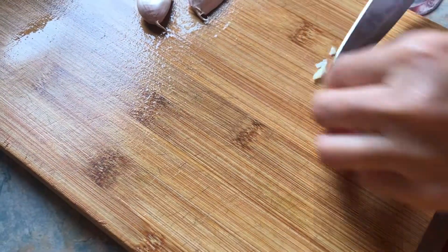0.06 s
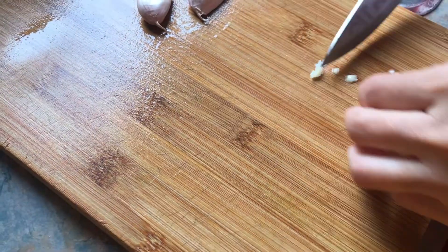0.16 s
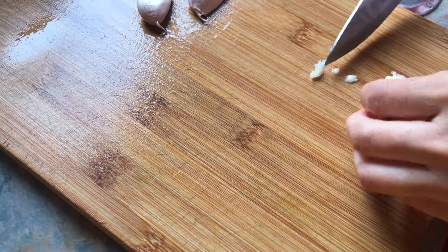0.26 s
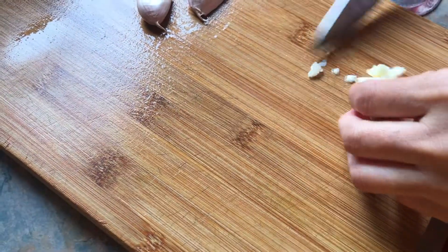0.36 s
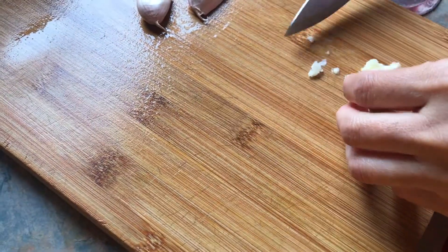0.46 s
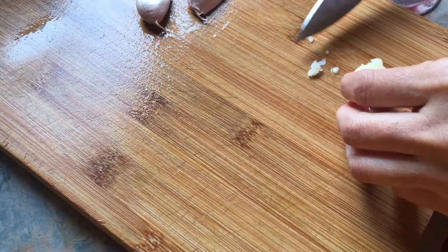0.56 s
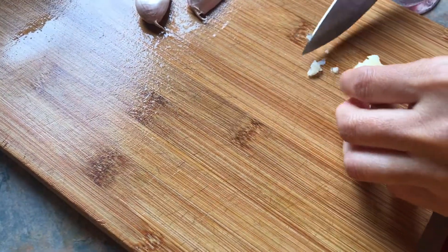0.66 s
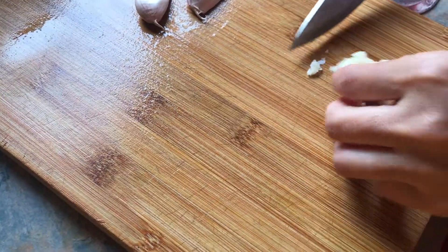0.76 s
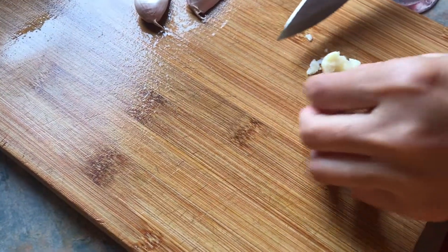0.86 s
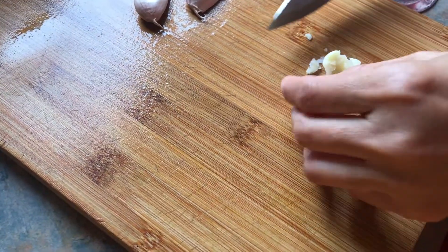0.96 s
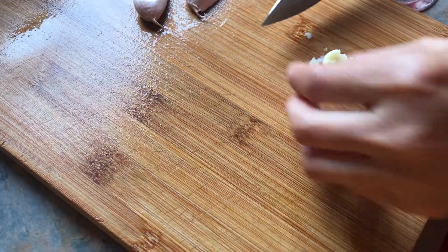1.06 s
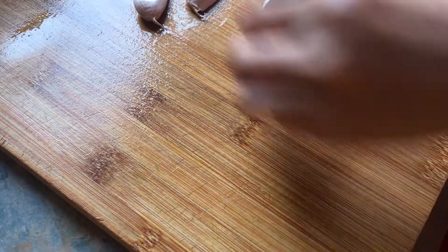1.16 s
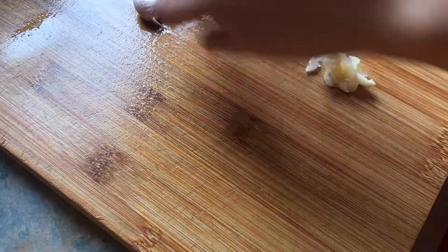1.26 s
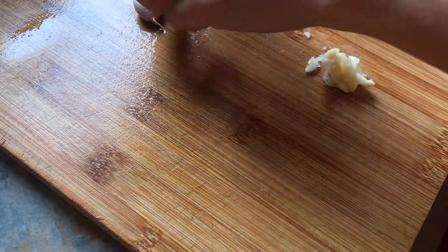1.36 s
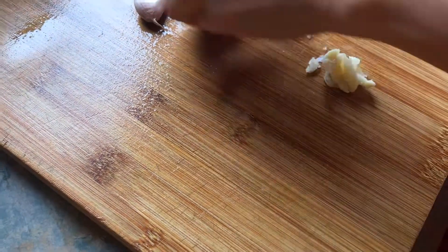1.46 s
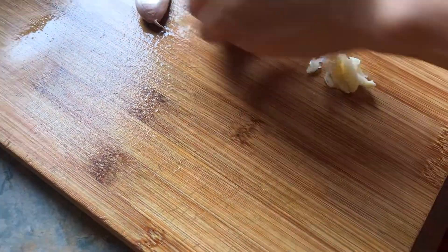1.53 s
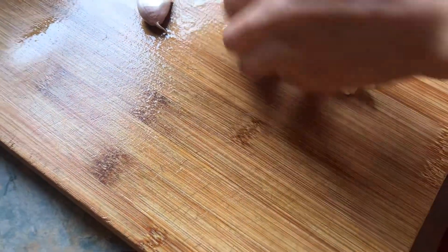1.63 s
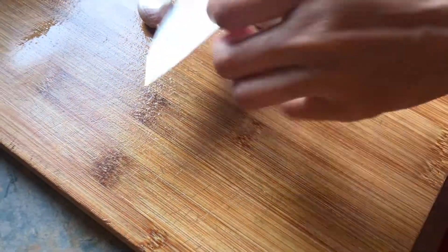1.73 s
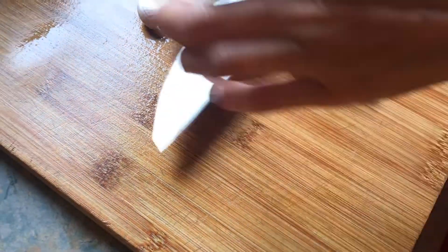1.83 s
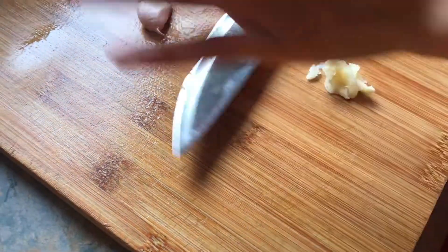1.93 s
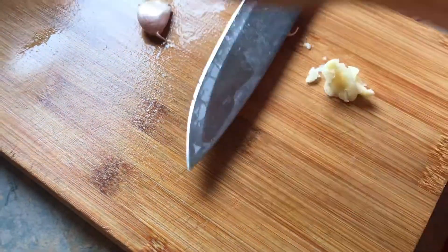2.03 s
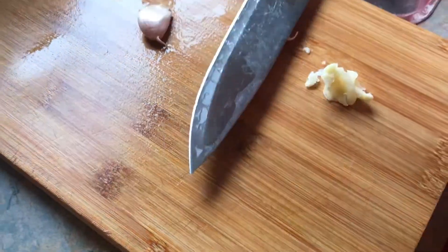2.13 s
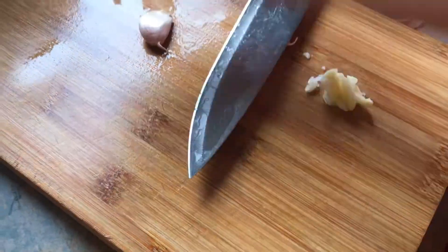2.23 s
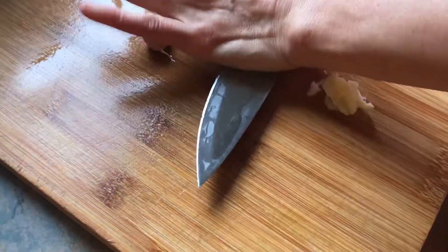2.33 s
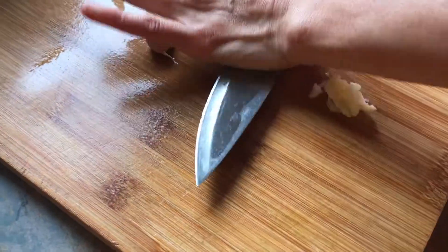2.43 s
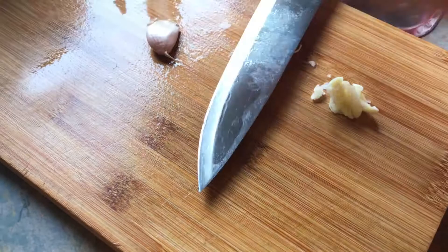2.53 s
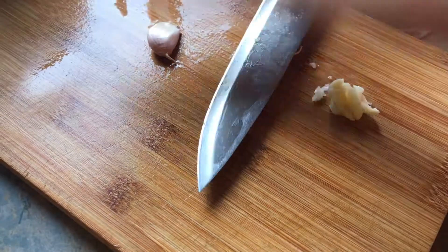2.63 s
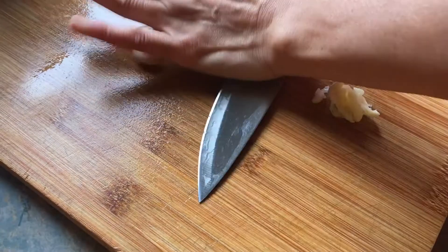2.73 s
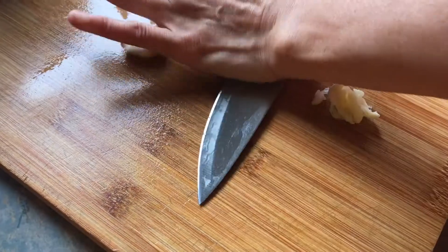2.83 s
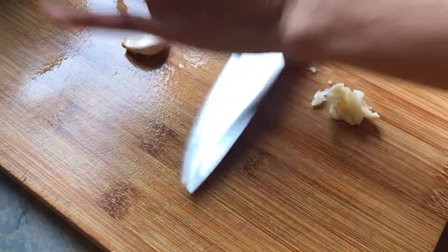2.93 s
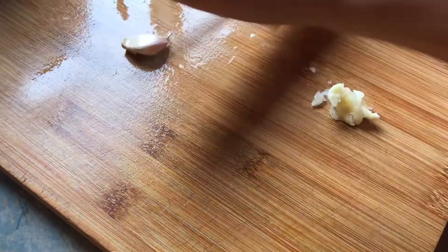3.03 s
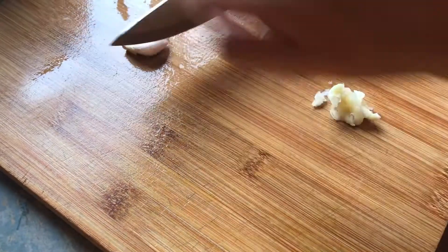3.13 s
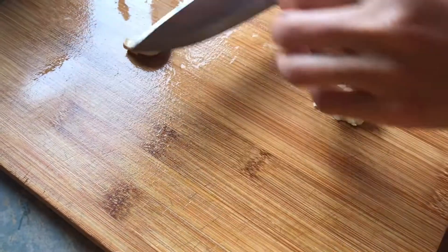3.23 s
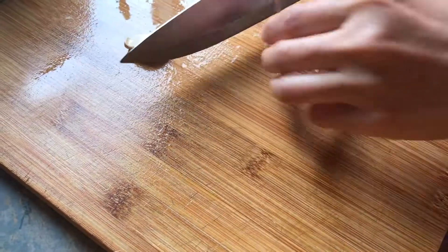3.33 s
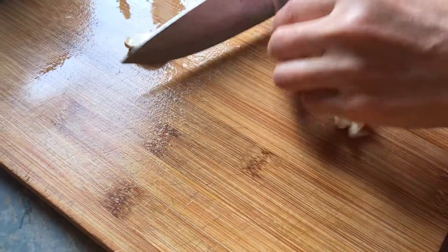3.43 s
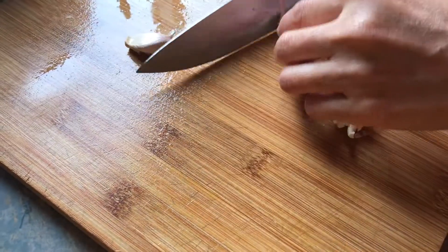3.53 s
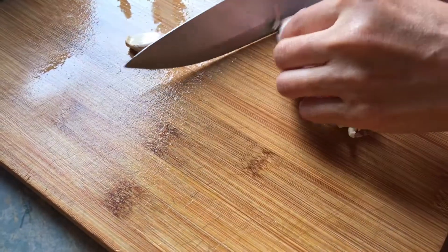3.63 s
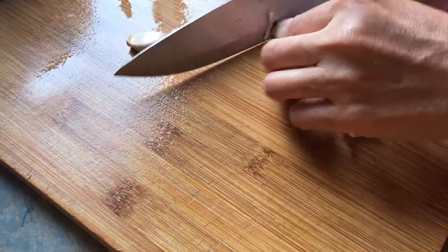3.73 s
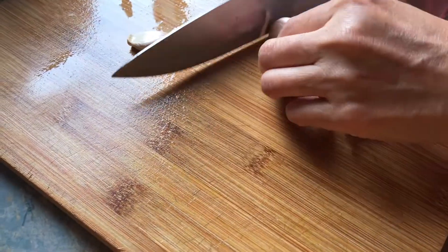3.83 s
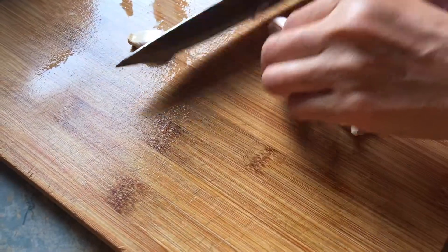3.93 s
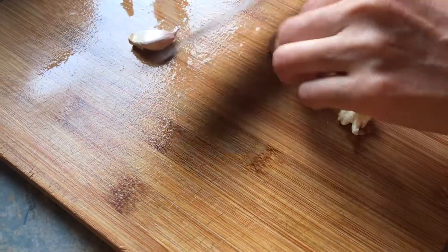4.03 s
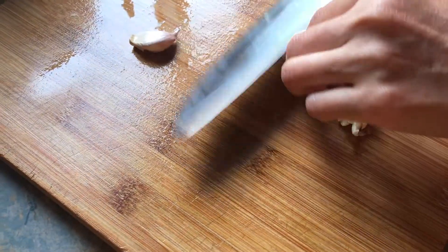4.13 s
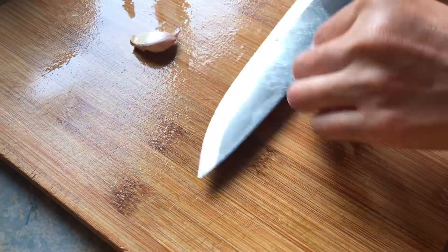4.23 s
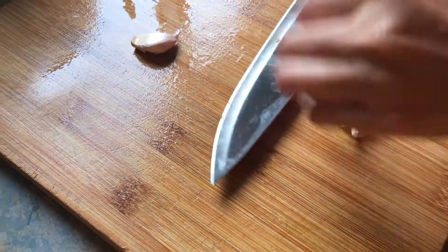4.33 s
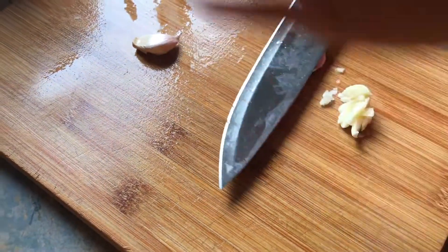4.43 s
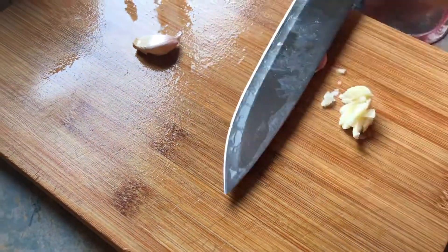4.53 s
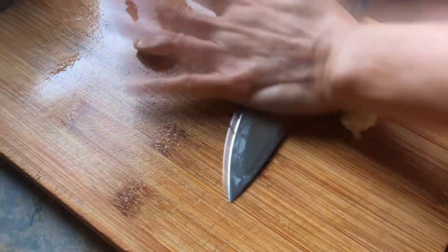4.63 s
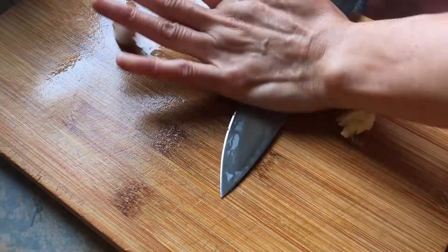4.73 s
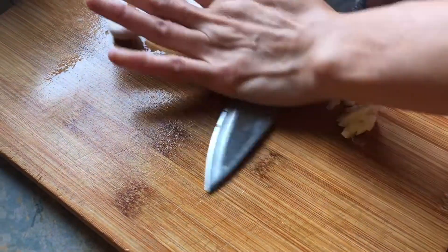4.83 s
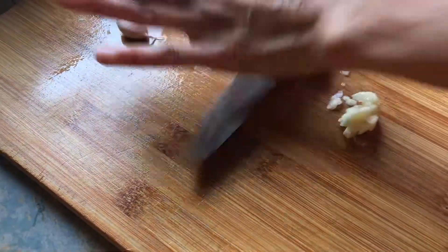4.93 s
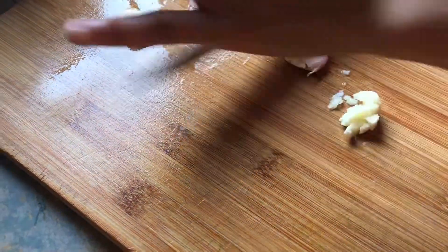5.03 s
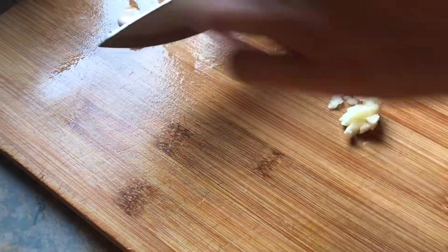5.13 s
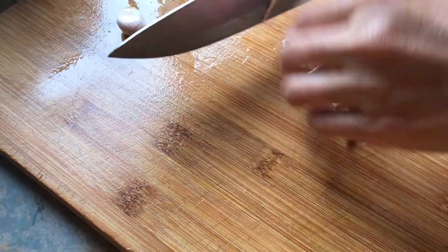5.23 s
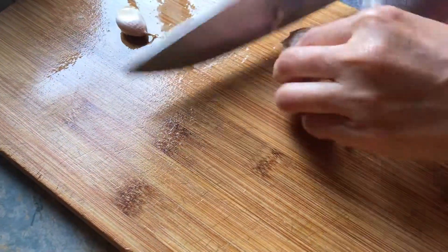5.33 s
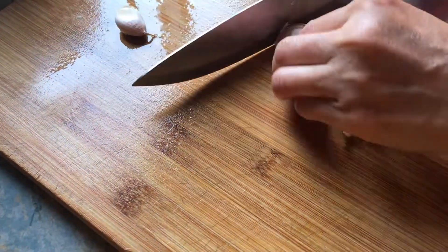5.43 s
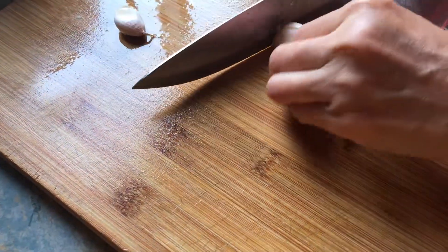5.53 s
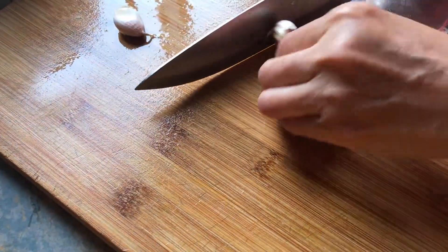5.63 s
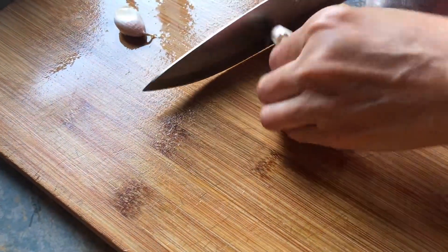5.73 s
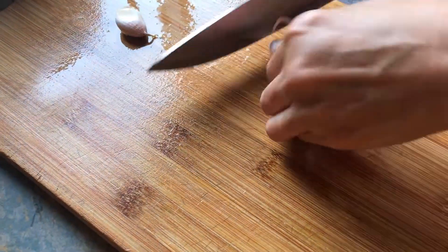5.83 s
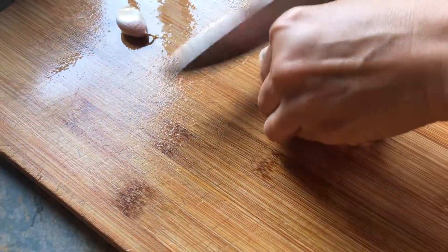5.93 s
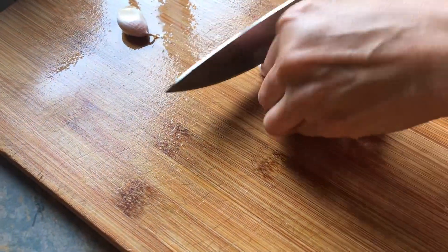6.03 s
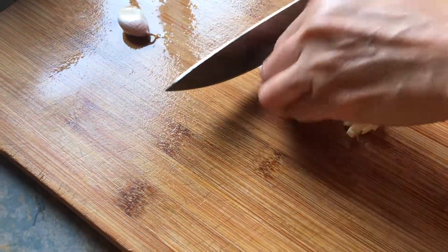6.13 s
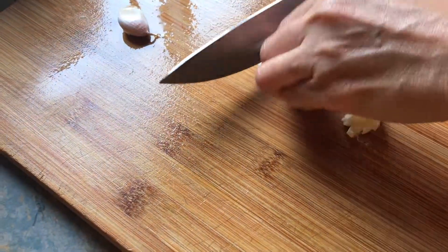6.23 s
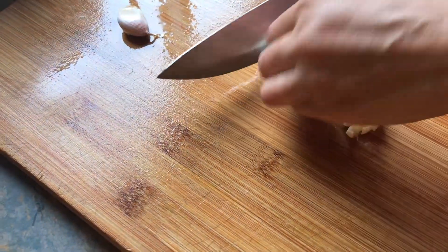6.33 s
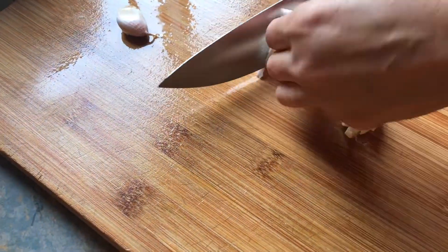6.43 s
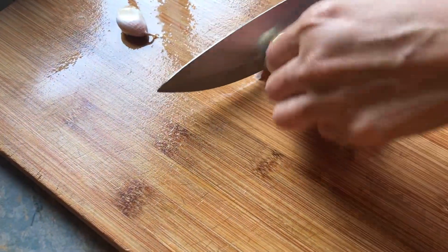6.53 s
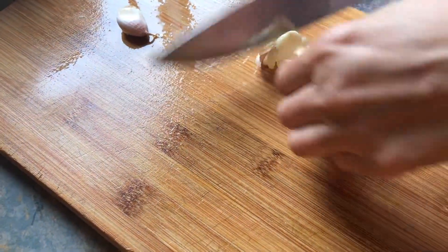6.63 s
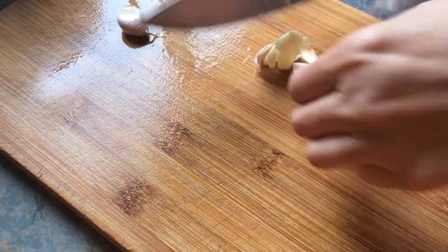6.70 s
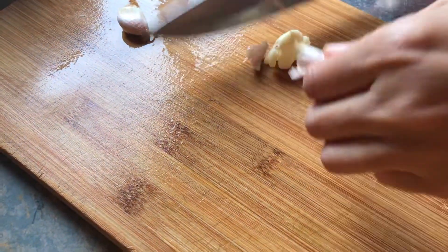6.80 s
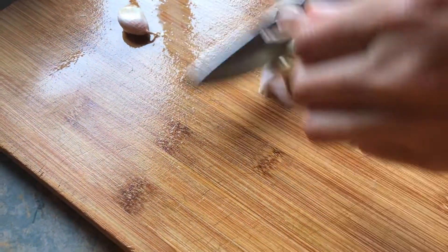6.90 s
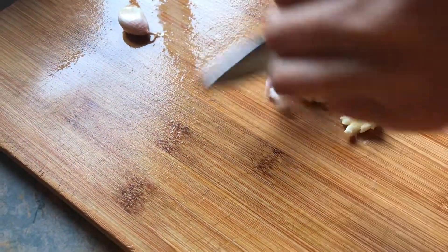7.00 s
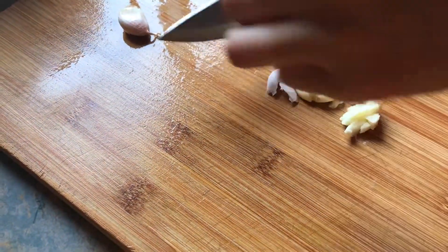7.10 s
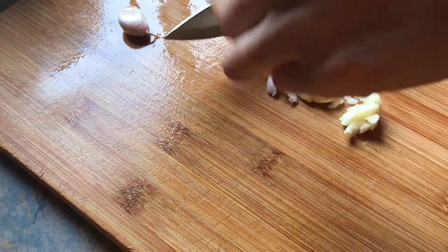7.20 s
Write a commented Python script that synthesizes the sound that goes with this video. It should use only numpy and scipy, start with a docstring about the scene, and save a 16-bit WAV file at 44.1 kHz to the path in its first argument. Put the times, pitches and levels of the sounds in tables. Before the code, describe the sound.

Garlic being crushed and peeled, heard at close range with short indoor reverberation. Sparse wooden knife taps and a barely audible squeak lead to two sharp, brittle crunches with wooden slaps and sinking low thuds. Lighter taps and papery scraping continue, a third smash lands, then a single hard knock with a slight steel ring, and finally dry skin snapping and rustling. A refrigerator hums very quietly beneath.

```python
"""Crushing garlic on a wooden board

A knife knocks on a board: filtered board modes, a counter thump and a short steel ring. Three times a palm smacks
the flat blade on a clove: brittle cracks, a dense crunch, a wooden slap and a thud that sinks in pitch. Dry skin
snaps and rubs as random fractures, and a thin squeak slides down early on. All of this rings in a small kitchen
made of decaying noise bands, over a fridge hum of wavering sine orders and a low rush of filtered noise."""
import sys
import numpy as np
from scipy import signal
from scipy.fft import rfft, irfft, next_fast_len
from scipy.io import wavfile

SR = 44100
rng = np.random.default_rng(int(sys.argv[2]) if len(sys.argv) > 2 else 0)


def master_out(mix):
    """Clip the mix to full scale and print it as 16-bit PCM to the path in sys.argv[1]."""
    frames = np.transpose(np.atleast_2d(mix))
    ceiling = np.clip(frames, -1, 1)
    pcm = np.round(ceiling * 32767).astype(np.int16)
    wavfile.write(sys.argv[1], SR, pcm)


N = 320166
TIME = np.arange(N) / SR
RING = TIME[:int(.55 * SR)]  # time axis of one event


def undb(db):
    """Amplitude factor of a level in dB."""
    return 10 ** (np.asarray(db) / 20)


def unit_peak(x):
    """Scale to a peak of 1."""
    return x / np.abs(x).max()


def unit_rms(x):
    """Scale to an rms of 1."""
    return x / np.sqrt(np.mean(x ** 2))


def add(track, s, sound):
    """Mix a sound into the track from time s on."""
    start = int(s * SR)
    track[start:start + len(sound)] += sound[:N - start]


def read(points, hz):
    """Value of a (Hz, value) table on a log-frequency axis."""
    f, value = np.transpose(points)
    return np.interp(np.log(hz + 1), np.log(f), value)


def colour(x, points):
    """Causal, minimum-phase filter with the given (Hz, dB) spectrum."""
    size = 2 * next_fast_len(len(x))
    hz = np.arange(size // 2 + 1) * SR / size
    cepstrum = irfft(np.log(undb(read(points, hz))))
    # fold the cepstrum onto positive times
    cepstrum[1:size // 2] *= 2
    cepstrum[size // 2 + 1:] = 0
    response = np.exp(rfft(cepstrum))
    return irfft(rfft(x, size) * response)[:len(x)]


def cut(x, hz, kind, order=2):
    """Butterworth low-pass or high-pass, kept below the Nyquist limit."""
    b, a = signal.butter(order, min(hz / SR * 2, .95), kind)
    return signal.lfilter(b, a, x)


def through(x, response):
    """Excite a body, given its tap response, with x."""
    return signal.fftconvolve(x, response)[:len(x)]


def fade(t60):
    """Exponential decay by 60 dB in t60 seconds."""
    return np.exp(-np.log(1000) * RING / t60)


def ring(modes):
    """Response of a body to one sharp tap: a sum of decaying sines."""
    return sum(undb(db) * fade(t60) * np.sin(2 * np.pi * hz * RING) for hz, db, t60 in modes)


def sway(modes, swell=0.037):
    """Heavy, loosely coupled modes take a share (swell) of their life to build up."""
    out = np.zeros(len(RING))
    for hz, db, t60 in modes:
        envelope = fade(t60) - fade(t60 * swell)
        out += undb(db) * envelope * np.sin(2 * np.pi * hz * RING)
    return out


def crackle(count, per_s, spread_db):
    """Tiny fractures at random moments; with a spread most are weak and a few strong."""
    sizes = undb(spread_db * np.minimum(rng.exponential(size=count), np.pi))
    hits = rng.random(count) < per_s / SR
    return unit_rms(hits * rng.choice([-1, 1], count) * sizes)


def skin(x, hz):
    """Dry skin radiates a broad band; smaller flakes sound higher."""
    return cut(cut(x, hz * 0.27, "high"), hz * 1.7, "low", order=1)


def fridge(shaft_hz=29.8, waver=0.033, hum_waver_db=1.3, air_db=-62, air_waver_db=2.0):
    """Compressor shaft orders, slightly wavering in pitch and level, over the low rush of the room."""
    # Each row: multiple of the shaft speed, mean level in dB rms.
    orders = [(2, -60), (3, -76), (6, -76.5), (7, -78), (8, -84.5), (11, -76)]
    # Spectrum of the rush. Each row: frequency in Hz, relative level in dB.
    air_spectrum = [(25, -26), (45, -3.5), (65, -13), (120, -17), (220, -16), (330, -19), (460, -28),
                    (1000, -29.5), (2000, -39), (5000, -45.5), (10000, -50), (16000, -45.5)]
    knots_s = np.arange(0, N / SR + 1, 1 / 6)

    def walk():
        """Slow random curve."""
        return np.interp(TIME, knots_s, rng.standard_normal(len(knots_s)))

    turns = np.cumsum(shaft_hz * (1 + waver * walk())) / SR
    hum = np.zeros(N)
    for multiple, db in orders:
        gain = np.sqrt(2) * undb(db + hum_waver_db * walk())
        hum += gain * np.sin(2 * np.pi * (multiple * turns + rng.random()))
    air = unit_rms(colour(rng.standard_normal(N), air_spectrum))
    return hum + undb(air_db + air_waver_db * walk()) * air


def wooden_board(grain_db=-1.5, grain_t60_s=0.04):
    """Main modes of the wood, with many weak, quickly damped ones between them as decaying noise."""
    # Each row: frequency in Hz, relative level in dB, t60 in seconds.
    board_modes = [(298.2, -19, 0.053), (325, -10, 0.17), (526, -15, 0.064), (589, -9.5, 0.096),
                   (659, -8, 0.042), (997, -1, 0.019), (1074, -7, 0.024), (1140, -1.5, 0.015),
                   (1550, -3, 0.029), (1950, -9.5, 0.053), (2210, -8, 0.024), (2615, -8.5, 0.031),
                   (3150, -14, 0.043), (3950, -17.5, 0.034), (5200, -11.5, 0.072)]
    # Each row: frequency in Hz, relative level in dB.
    grain_spectrum = [(150, -9), (500, -0.5), (1000, 0), (2300, -6), (3800, -9.5), (6000, -4.5),
                      (10000, -23), (16000, -18.5)]
    grain = colour(rng.standard_normal(len(RING)) * fade(grain_t60_s), grain_spectrum)
    return unit_rms(ring(board_modes)) + undb(grain_db) * unit_rms(grain)


def swaying_counter():
    """Board and counter swaying together."""
    # Each row: frequency in Hz, relative level in dB before build-up, t60 in seconds.
    counter_modes = [(44.8, -26.5, 0.53), (57.6, -22.5, 1), (76.7, -13, 0.47), (96, -6, 0.099),
                     (113.8, -0.5, 0.096), (137, -6.5, 0.13), (165, -1.5, .13), (209.7, 3, 0.1),
                     (262, -2.5, 0.13)]
    return sway(counter_modes)


def steel_blade():
    """Ring of the undamped steel blade."""
    # Each row: frequency in Hz, relative level in dB, t60 in seconds.
    blade_modes = [(5250, -9, .06), (7200, -7, .05), (8683, 0, .1), (10040, -2, .09), (12021, -9, .07),
                   (13544, -7, .07), (14045, -1, .08), (15612, -5, .07)]
    return unit_peak(ring(blade_modes))


def knocks(board, counter, blade, steel_db=-26.5, grip_t60_s=0.21, bounce_s=0.002953, bounce_db=-18):
    """A harder contact reaches higher board modes; the edge bounces once and the knife's weight nudges the counter."""
    # Each row: time in seconds, peak of the wood in dB, contact sharpness in Hz,
    # counter thump in dB relative to the wood.
    contacts = [(0.3748, -30.5, 1260, -48), (1.929, -26.5, 1200, 1.5), (3.160, -33.5, 755, -13),
                (3.58, -30, 960, -10.5), (3.86, -44.5, 700, -3), (4.28, -56, 1200, 14.5),
                (4.964, -29.5, 2817, -10), (5.3678, -37, 2010, -13.5), (5.4394, -6.5, 2050, -21.5),
                (6.023, -45, 3520, -12), (6.563, -38.5, 3240, -21), (7.033, -48.5, 2200, -21)]
    low_edge_hz, low_edge_power = 194, 1.57  # low edge for a 1 kHz contact; climbs with sharpness
    out = np.zeros(N)
    thump = unit_peak(cut(counter, 90, "high"))
    steel = blade * fade(grip_t60_s)  # the hand gripping the knife damps the blade's ring
    for s, db, sharp_hz, thump_db in contacts:
        low_hz = low_edge_hz * (sharp_hz / 1000) ** low_edge_power
        wood = unit_peak(cut(cut(board, sharp_hz, "low"), low_hz, "high"))
        add(out, s, undb(db) * (wood + undb(thump_db) * thump + undb(steel_db) * steel))
        add(out, s + bounce_s, undb(db + bounce_db) * wood)
    return out


def rubs(board, blade, wood_db=-11, catch_db=5, catch_s=0.019, tear_db=-3):
    """Papery skin slips in fits and tears now and then; the wood sounds along and the dragged steel sings."""
    # Each row: start in seconds, length in seconds, skin level in dB rms before the pressure envelope,
    # centre in Hz, blade ring in dB relative to the skin.
    spells = [(0.407, 0.042, -63.5, 3360, -0.5), (1.483, 0.18, -77.5, 4470, -12),
              (2.172, 0.23, -81, 4430, -20), (2.947, 0.074, -60.5, 10000, -12),
              (3.453, 0.15, -70.5, 8000, -4), (3.697, .17, -65.5, 6600, -9),
              (4.031, 0.042, -61, 10400, -16), (4.254, 0.017, -59, 9000, -7), (4.977, 0.13, -70, 8860, -12),
              (5.606, 0.475, -67, 8900, -26), (6.164, 0.36, -68, 7600, -17),
              (6.419, 0.067, -54.5, 6530, -30), (6.504, 0.18, -65, 6000, -25),
              (6.935, 0.078, -59.5, 3220, -20)]
    attack_s, release_s = 0.015, 0.042
    out = np.zeros(N)
    for s, length_s, db, hz, blade_db in spells:
        corners_s = np.cumsum([0, attack_s, length_s, release_s])
        pressure = np.interp(RING, corners_s, [0, 1, 1, 0]) ** 2
        grip = rng.uniform(-1.7, 1, size=256)  # the skin catches in fits and starts
        fits = undb(catch_db * np.interp(RING, np.arange(len(grip)) * catch_s, grip))
        tears = crackle(len(RING), per_s=90, spread_db=3)
        slips = fits * crackle(len(RING), per_s=630, spread_db=0.0) + undb(tear_db) * tears
        steel = undb(blade_db) * unit_rms(through(slips, blade))
        wood = undb(wood_db) * unit_rms(through(slips, board))
        add(out, s - attack_s, undb(db) * pressure * (unit_rms(skin(slips, hz)) + steel + wood))
    return out


def squeak(start_s=.76, length_s=0.26, attack_s=.04, start_hz=5300, sag_hz_per_s=1100, db=-85, flutter=0.0056):
    """A thin, unsteady tone that slides down and dies away."""
    age_s = np.clip(TIME - start_s, 0, length_s)
    unsteady = unit_rms(cut(rng.standard_normal(N), 150, "low"))
    pitch_hz = (start_hz - sag_hz_per_s * age_s) * (1 + flutter * unsteady)
    gain = np.sqrt(2) * undb(db) * np.interp(age_s, [0, attack_s, length_s], [0, 1, 0])
    return gain * np.sin(2 * np.pi * np.cumsum(pitch_hz) / SR)


def snap(hz, crack_t60=0.0026, flake_db=-17, flake_t60=0.0022, splinter_db=-28, splinter_t60=0.23):
    """One brittle crack rings a flake of skin, with a few smaller fractures behind it."""
    crack = unit_peak(rng.standard_normal(len(RING)) * fade(crack_t60))
    flake_hz = hz * rng.uniform(0.61, 1.0, size=3)
    flake = unit_peak(ring([(f, 0, flake_t60) for f in flake_hz]))
    splinters = crackle(len(RING), per_s=1400, spread_db=10.0) * fade(splinter_t60)
    return unit_peak(skin(crack + undb(flake_db) * flake + undb(splinter_db) * splinters, hz))


def snaps():
    """Pieces of skin and flesh break off one by one, each with a short tearing after it."""
    # Each row: time in seconds, peak in dB, centre in Hz.
    breaks = [(1.9301, -38.5, 3750), (3.0051, -34, 5540), (3.1596, -42, 7960), (3.457, -43.5, 4600),
              (3.9482, -44.5, 5970), (4.1546, -43.5, 8150), (4.275, -33, 6100), (4.931, -35.5, 5970),
              (4.938, -31, 5570), (4.9717, -34, 12300), (5.613, -32.5, 10000), (5.7022, -34, 9000),
              (5.802, -32.5, 14000), (5.812, -33.5, 10900), (6.0286, -28, 7800), (6.1744, -35, 10370),
              (6.19, -36, 9100), (6.242, -30.5, 7800), (6.4196, -40.5, 3600), (6.5664, -40, 4960),
              (6.6507, -39, 8930), (6.9302, -39.5, 3500), (6.943, -31.5, 3030), (7.001, -38, 4000)]
    out = np.zeros(N)
    for s, db, hz in breaks:
        add(out, s, undb(db) * snap(hz, crack_t60=0.0083, splinter_db=-23.5, splinter_t60=0.08))
    return out


def bend(x, travel_s=0.0044, ref_hz=100):
    """Bending waves run slower the lower they are (travel_s at ref_hz), so a thud sinks in pitch."""
    size = 2 * len(x)
    hz = np.arange(len(x) + 1) * SR / size
    dispersion = np.exp(-4j * np.pi * travel_s * np.sqrt(ref_hz * hz))
    return irfft(rfft(x, size) * dispersion)[:len(x)]


def boom(start_hz=140, end_hz=59.7, sag_s=0.02, rise_s=0.0025, t60_s=.31):
    """The slowest bending wave of the counter, sliding down as it fades."""
    hz = end_hz + (start_hz - end_hz) * np.exp(-RING / sag_s)
    envelope = (1 - np.exp(-RING / rise_s)) * fade(t60_s)
    return envelope * np.sin(2 * np.pi * np.cumsum(hz) / SR)


def smashes(board, counter, lead_s=.005, rise_s=.0022, collapse_t60_s=0.081):
    """The clove splits and bursts in a crunch, the blade slaps the wood, the palm's weight lands, the skin settles."""
    # Each row: time in seconds, crack in dB, crush in dB, crush brightness in Hz, wood in dB, thud in dB,
    # palm sharpness in Hz.
    palm_hits = [(2.3377, -11.5, -20, 13320, -18.5, -14, 130),
                 (2.7306, -12.5, -12.5, 6894, -13.5, -12.5, 1480),
                 (4.7108, -9, -13.5, 11760, -17.5, -12.5, 300)]
    # A clove splits twice. Each row: seconds after the palm lands, dB relative to the crack, centre in Hz.
    splits = [(-.002, -1, 4660), (.002, 0, 7570)]
    # Each row: frequency in Hz, relative level in dB.
    crush_spectrum = [(200, -13.5), (600, -8.5), (1100, 8), (1600, -4), (2200, 3.5), (3200, -4),
                      (4600, 0.5), (7000, -3), (10000, -10), (15000, -2)]
    slap_lag_s, thud_lag_s, boom_lag_s = 0.00083, .001, .003
    boom_db = -7.5  # relative to the thud
    settle_db, settle_t60_s, settle_hz = -57.5, 1, 9000  # skin goes on crackling under the blade
    out = np.zeros(N)
    age_s = RING - lead_s
    rise = np.minimum(age_s, 0) / rise_s
    collapse = np.log(1000) * np.maximum(age_s, 0) / collapse_t60_s
    burst = np.exp(rise - collapse)
    slap = unit_peak(cut(cut(board, 1500, "low"), 360, "high"))
    for s, crack_db, crush_db, bright_hz, wood_db, thud_db, palm_hz in palm_hits:
        for lag_s, db, hz in splits:
            add(out, s + lag_s, undb(crack_db + db) * snap(hz))
        fractures = crackle(len(RING), per_s=14000, spread_db=2.0)
        crunch = cut(colour(fractures * burst, crush_spectrum), bright_hz, "low", order=1)
        add(out, s - lead_s, undb(crush_db) * crunch)
        add(out, s + slap_lag_s, undb(wood_db) * slap)
        thud = unit_peak(cut(bend(counter), palm_hz, "low", order=1))
        add(out, s + thud_lag_s, undb(thud_db) * thud)
        add(out, s + boom_lag_s, undb(thud_db + boom_db) * boom())
        settling = skin(crackle(len(RING), per_s=1000, spread_db=5), settle_hz)
        add(out, s, undb(settle_db) * fade(settle_t60_s) * settling)
    return out


def kitchen(x, wet_db=-9, build_s=0.0024):
    """Two early reflections, then a diffuse field: each band stores the energy fed to it and lets it die away."""
    # Nearby surfaces. Each row: delay in seconds, level in dB.
    reflections = [(.0031, -17.5), (0.0124, -14.5)]
    # Each row: frequency in Hz, t60 in seconds.
    decay = [(150, 0.44), (500, .38), (2000, 0.49), (6000, 0.45), (15000, 0.14)]
    # Each row: frequency in Hz, diffuse level in dB relative to wet_db.
    echo_spectrum = [(130, -6), (300, 0), (1000, -3.5), (3000, -4), (8000, -9.5), (16000, -7.5)]
    out = x.copy()
    for delay_s, db in reflections:
        add(out, delay_s, undb(db) * cut(x, 360, "high", order=1))  # small surfaces send back little bass
    edges_hz = np.geomspace(110, 17000, 20)
    for low_hz, high_hz in zip(edges_hz, edges_hz[1:]):
        band = signal.butter(4, [low_hz, high_hz], "band", fs=SR, output="sos")
        centre_hz = np.sqrt(low_hz * high_hz)
        energy = signal.sosfilt(band, x + 1e-12 * rng.standard_normal(N)) ** 2
        decay_s = read(decay, centre_hz) / np.log(1000) / 2  # time constant of energy
        for tau_s in (build_s, decay_s):
            keep = np.exp(-1 / (tau_s * SR))
            energy = signal.lfilter([1 - keep], [1, -keep], energy)
        diffuse = unit_rms(signal.sosfilt(band, rng.standard_normal(N)))
        out += undb(wet_db + read(echo_spectrum, centre_hz)) * np.sqrt(energy) * diffuse
    return out


def scene():
    """Knife and garlic sounds in the kitchen, plus the fridge."""
    board, counter, blade = wooden_board(), swaying_counter(), steel_blade()
    work = knocks(board, counter, blade) + rubs(board, blade) + squeak() + snaps() + smashes(board, counter)
    return (kitchen(work) + fridge())[None]


def record(dry, bass_hz=46, top_hz=16200):
    """The microphone drops the deepest bass and cuts the top."""
    top_cut = signal.ellip(10, .2, 80, top_hz, fs=SR, output="sos")
    return signal.sosfilt(top_cut, cut(dry, bass_hz, "high", order=3))


dry = scene()
out = record(dry)
master_out(out)
```